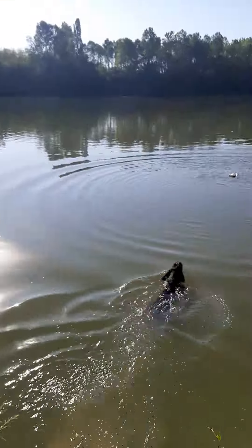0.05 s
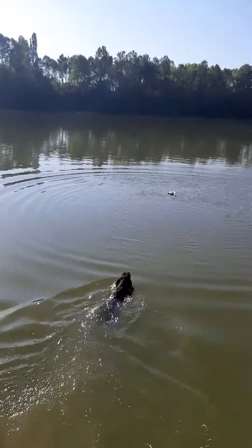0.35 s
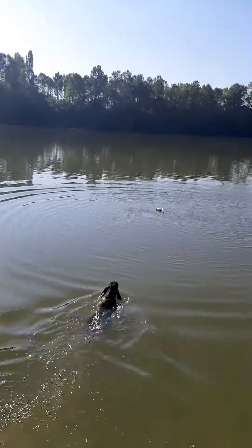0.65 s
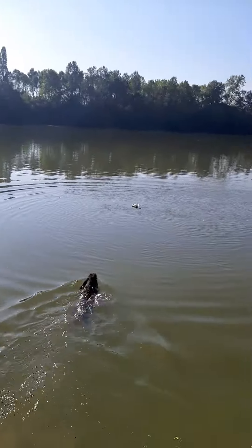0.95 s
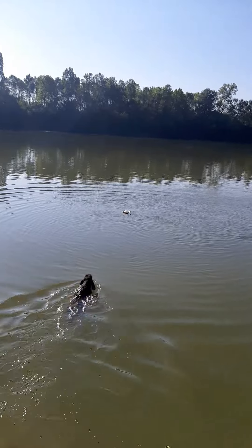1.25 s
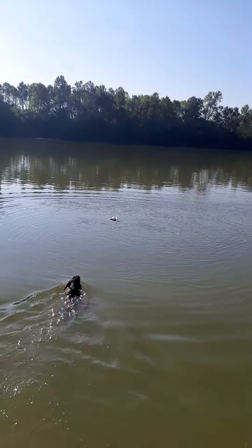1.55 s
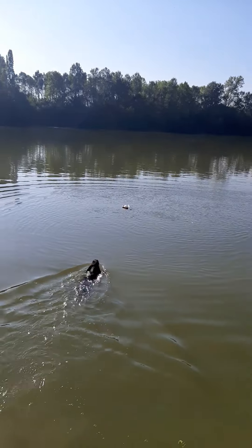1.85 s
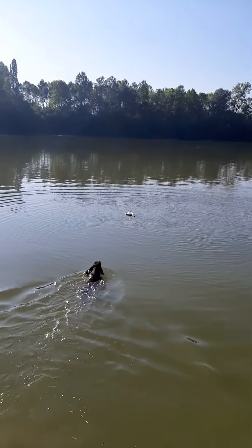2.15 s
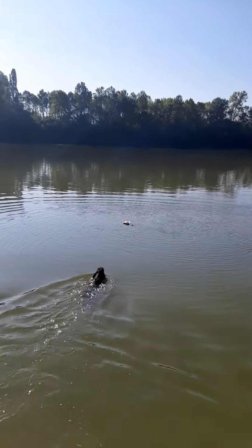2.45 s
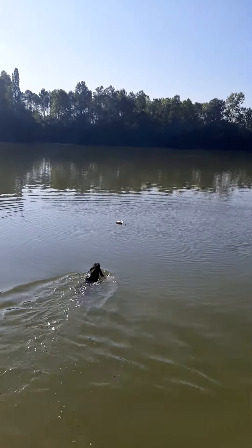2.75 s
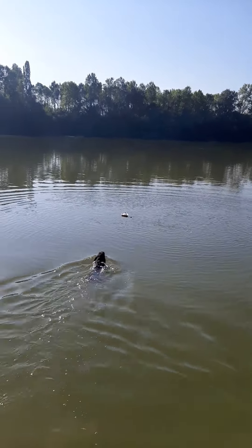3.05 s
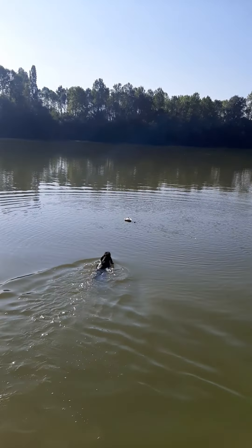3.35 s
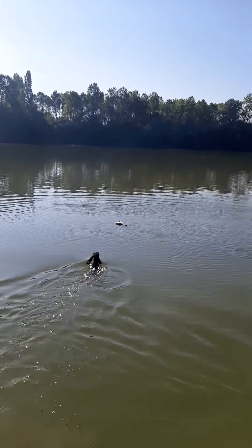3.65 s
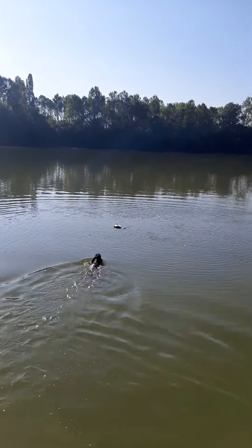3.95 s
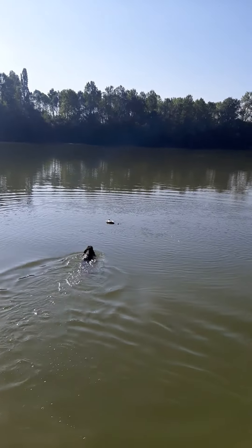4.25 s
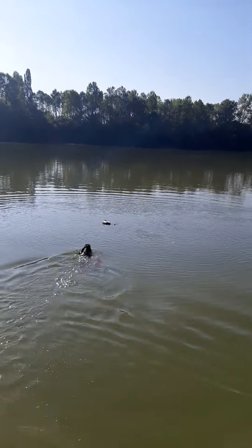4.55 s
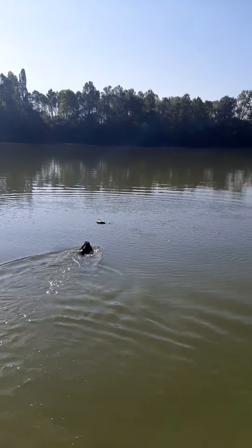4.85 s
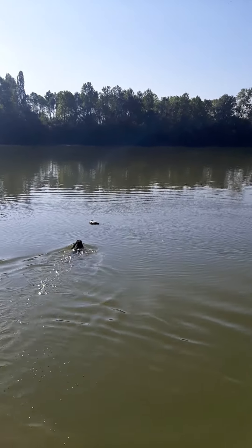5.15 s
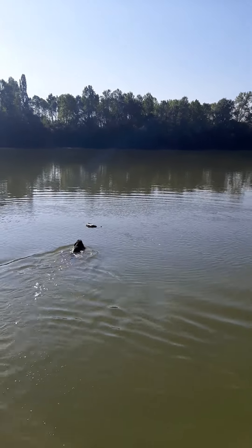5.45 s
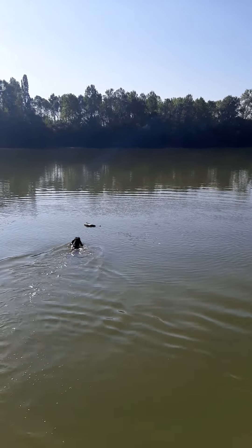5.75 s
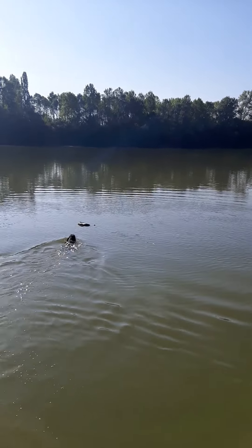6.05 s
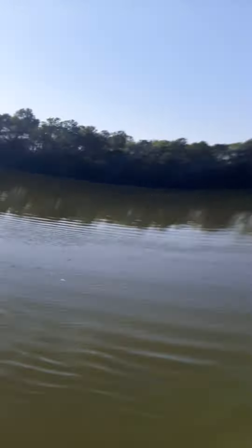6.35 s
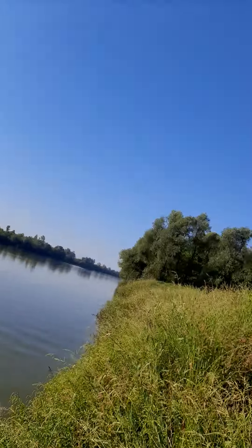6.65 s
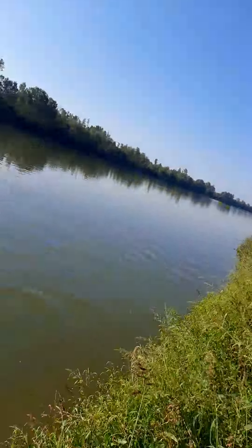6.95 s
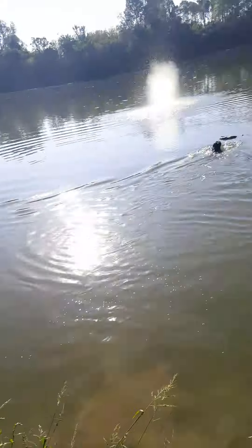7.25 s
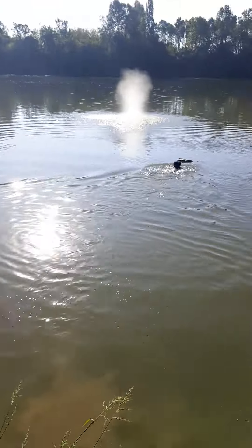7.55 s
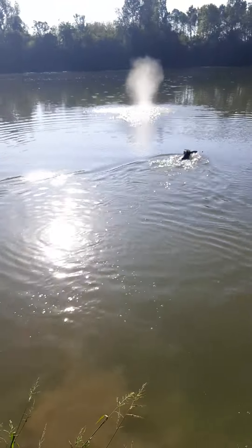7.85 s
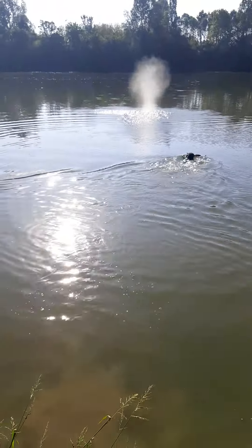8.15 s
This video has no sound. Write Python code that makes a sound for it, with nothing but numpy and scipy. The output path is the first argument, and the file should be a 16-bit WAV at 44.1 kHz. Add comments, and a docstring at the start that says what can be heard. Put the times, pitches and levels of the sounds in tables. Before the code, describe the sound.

Outdoors by a river, water plops and trickles as a dog swims a few metres out, with faint birds and a low hum of distant traffic behind. After a few dry clicks, a gun fires once right beside the microphone. Quick echoes clap from the bank, and a second later a rolling echo returns from distant trees, fading under a faint patter of drops.

```python
"""First a far road and engine hum across a calm river, while a dog paddles away from the stereo microphone,
its paws folding air into plopping bubbles. Small birds call from the trees. A gun beside the microphone
is readied and fired at the water: the near bank rattles back, and a second later the far woods answer
with a long roar while spray patters down. The recorder's gain control ducks at the shot and creeps back."""
import sys
import numpy as np
from scipy import signal
from scipy.fft import rfft, irfft
from scipy.io import wavfile

SR = 44100
rng = np.random.default_rng(int(sys.argv[2]) if len(sys.argv) > 2 else 0)


def transcribe(signal):
    """Save signal, clipped to [-1, 1], as a 16-bit WAV file at the path in sys.argv[1]."""
    frames = np.atleast_2d(signal).T
    limited = np.clip(frames, -1, 1)
    pcm = np.round(limited * 32767).astype(np.int16)
    wavfile.write(sys.argv[1], SR, pcm)


N = 370440
T = np.arange(N) / SR


def undb(db):
    """Decibels to gain."""
    return 10 ** (np.asarray(db) / 20)


def unit(x):
    """Scale to an rms of one; for a pair, that of their mean."""
    return x / np.sqrt(np.mean(np.atleast_2d(x).mean(axis=0) ** 2))


def tint(x, colour):
    """Filter by (Hz, dB) points joined on a log-frequency axis."""
    hz, db = np.transpose(colour)
    f = np.fft.rfftfreq(x.shape[-1], 1 / SR) + 1
    return irfft(rfft(x) * undb(np.interp(np.log(f), np.log(hz), db)), x.shape[-1])


def lowpass(x, hz):
    """Two-pole loss of treble."""
    return signal.sosfilt(signal.butter(2, min(hz, SR / 2 - 1), fs=SR, output="sos"), x)


# width of diffuse sound at the microphone: f/Hz, side minus mid/dB
STEREO_WIDTH = [(110, -12), (200, -15), (380, -8.5), (700, -7), (1200, -1), (2400, 1), (15000, 0)]

def diffuse(colour, size=N, grain_db=0):
    """Coloured stereo noise; grain_db scatters the sizes of its particles."""
    sizes = undb(grain_db * np.minimum(rng.exponential(size=size), 5))
    mid, side = rng.standard_normal((2, size)) * sizes
    return unit(tint(mid + np.outer([1, -1], tint(side, STEREO_WIDTH)), colour))


def octaves(x):
    """Split into overlapping octave bands: (centre Hz, band)."""
    octave = np.clip(np.log2(np.fft.rfftfreq(N, 1 / SR) + 1), 6, 14)
    spectrum = rfft(x)
    return [(2. ** k, irfft(spectrum * np.maximum(1 - abs(octave - k), 0), N)) for k in range(6, 15)]


def wander(per_s):
    """A random curve with a spread near one and per_s new values a second."""
    return np.interp(T * per_s, np.arange(4096), rng.standard_normal(4096))


def fade(t, t60):
    """Exponential decay, 60 dB down after t60."""
    return np.exp(-np.log(1000) * np.maximum(t, 0) / t60)


def envelope(s, db, rise_s, hold_s, t60):
    """Gain of a sound that swells from time s, holds and dies away."""
    return undb(db) * np.clip((T - s) / rise_s, 0, 1) ** 2 * fade(T - s - rise_s - hold_s, t60)


def overlap(rows):
    """Joint gain of several envelopes whose powers add."""
    return np.sqrt(sum(envelope(*row) ** 2 for row in rows))


def tone(hz, db):
    """A sine on a moving pitch, at an rms level."""
    return undb(db) * np.sqrt(2) * np.sin(2 * np.pi * np.cumsum(hz) / SR)


def add(out, s, sound, pan_db=0):
    """Mix a sound in at time s; pan_db is left minus right."""
    start = int(np.clip(s * SR, 0, N - 1))
    gains = undb([[pan_db / 2], [-pan_db / 2]])
    out[:, start:start + sound.shape[-1]] += (gains / gains.mean() * sound)[:, :N - start]


# far road rumble with the microphone's resonances and a faint high hiss: f/Hz, level/dB
BACKGROUND_COLOUR = [(30, -10.5), (86, -1.5), (141, -9.5), (203, -19), (330, -18), (460, -20.5),
                     (535, -15.5), (620, -23), (810, -25.5), (930, -22), (1650, -43), (2030, -34),
                     (2250, -41), (2550, -37.5), (2850, -46), (3500, -50), (7600, -58), (8200, -79),
                     (15800, -50)]

def background(level_db=-50.5, flicker_db=1):
    """Steady road rumble and hiss, coloured by the microphone, swell a little; each octave flickers."""
    swell_db = 0.28 * wander(2.3)
    bands = octaves(diffuse(BACKGROUND_COLOUR))
    return sum(band * undb(level_db + swell_db + flicker_db * wander(21)) for hz, band in bands)


# partials of a far engine, a little to the right: f/Hz, level/dB
ENGINE_PARTIALS = [(46, -55.5), (78, -49.5), (118.4, -57.5), (159, -68), (272, -68.5)]
# swells of a far whine: t/s, level/dB, hold/s
WHINE_SWELLS = [(0, -64, 0.18), (4.553, -67, 1.2)]

def engine(waver_hz=2, throb_db=2.5, trim_db=-1, pan_db=-2.1, whine_hz=406):
    """A throbbing drone and a faint whine drift in pitch with the engine's speed."""
    speed = 1 + 0.01175 * wander(1.7)
    drone = sum(tone(hz * speed + waver_hz * wander(14), db + trim_db + throb_db * wander(9))
                for hz, db in ENGINE_PARTIALS)
    whine = tone(whine_hz * speed + 2.5 * wander(13), 5.3 * wander(24))
    swells = overlap((s, db, 0.076, hold_s, 2.4) for s, db, hold_s in WHINE_SWELLS)
    return drone * undb([[pan_db / 2], [-pan_db / 2]]) + whine * swells


# spectrum of tiny drops behind the dog, a few metres out: f/Hz, level/dB
FIZZ_COLOUR = [(1500, -22), (4000, -2), (7500, -2), (8400, -9), (12000, -0.5), (15500, 0)]

def water_fizz(cluster_db=2.5, swish_db=3.0):
    """Drops of each size come in quick clusters and slower swishes."""
    return sum(band * undb(cluster_db * wander(170) + swish_db * wander(24) - 0.5)
               for hz, band in octaves(diffuse(FIZZ_COLOUR, grain_db=4.5)))


def wake(fizz, level_db=-66, foam_t60=5, start_m=3.9, swim_m_per_s=0.59):
    """Foam by the bank fizzes out; the wake fades as the dog swims away from the microphone."""
    distance_m = start_m + swim_m_per_s * T
    return fizz * np.hypot(fade(T, foam_t60), 1 / distance_m) * undb(level_db + 2 * wander(6.4))


def bubble(hz, cycles, linger=0.1, climb_per_s=22):
    """A pocket of air rings and rises in pitch as it nears the surface, where it lingers faintly."""
    t = T[:SR // 10]
    age = t * hz / cycles
    ring = fade(age, 1) + linger * fade(age, 3)
    swell = 1 - np.exp(-t * hz / 2)  # the neck closes over a couple of cycles
    return np.sin(2 * np.pi * hz * (t + climb_per_s * t ** 2 / 2)) * ring * swell


# paw strokes that trap air, a few metres out: t/s, level/dB, f/Hz, pan/dB, ringing/cycles
PAW_STROKES = [(0.17, -42.5, 1113, -9, 22), (0.21, -46, 900, -3, 31), (0.318, -53, 2100, 0, 24),
               (0.536, -43, 1260, -1, 51), (0.538, -34, 630, 1, 11.5), (0.674, -41, 935, 0, 6.9),
               (0.748, -46.5, 1130, -4, 29), (0.815, -43.5, 1890, 5, 33), (0.867, -37.5, 1710, 5, 32),
               (0.881, -33.5, 720, 1, 16), (0.882, -36, 1680, -4, 16), (0.897, -49, 1530, 0, 20),
               (0.975, -55, 1880, 6, 55), (1.234, -41.5, 920, 2, 13), (1.519, -43, 1076, 1, 16),
               (1.615, -46, 1090, 0, 39), (2.234, -43.5, 1257, 0, 35), (2.27, -41.5, 1120, 1, 14),
               (2.756, -45.5, 1100, 2, 28), (2.755, -49, 2280, 0, 32), (2.876, -51, 1980, 3, 49),
               (2.966, -50, 2040, 0, 28), (3.13, -37.5, 800, 2, 42), (3.71, -39, 890, 5, 10),
               (3.733, -39.5, 1070, -1, 15), (3.747, -47, 1000, 2, 6), (3.764, -37.5, 724, -1, 8.7),
               (3.775, -44, 1760, 4, 23), (3.781, -36, 1516, -7, 32), (3.953, -48, 1130, 0, 27),
               (4.115, -48, 833, -3, 23), (4.45, -38, 1180, 0, 8.3), (5.011, -36, 1610, 1, 11),
               (5.072, -39.5, 1800, -1, 21), (5.083, -45, 1900, 0, 36), (5.21, -46.5, 2410, 5, 37),
               (5.881, -41.5, 2480, 5, 27)]

def paddling(plop_db=3.2, slosh_db=-15, gulp_db=-10, gulp_hz=1400, gulp_cycles=15, stray_db=-60):
    """Each stroke gives one main bubble, a soft slosh and three gulps; strays burst in the wake."""
    out, t = np.zeros((2, N)), T[:SR // 5]
    slosh_colour = [(200, -31), (700, 9), (1900, -2), (2800, -17), (7500, -27), (9000, -40)]
    for s, db, hz, pan_db, cycles in PAW_STROKES:
        add(out, s - .001, undb(db + plop_db) * bubble(hz, cycles), pan_db)
        slosh = diffuse(slosh_colour, size=len(t)) * undb(4 * wander(250)[:len(t)])
        add(out, s, undb(db + slosh_db) * slosh * fade(t, .1) * np.minimum(t / .004, 1), pan_db / 2)
        for late, pitch, size, side in rng.standard_normal((3, 4)):
            gulp = bubble(np.sqrt(hz * gulp_hz) * np.exp(.22 * pitch), gulp_cycles)
            add(out, s + 0.022 * abs(late), undb(db + gulp_db + 2 * size) * gulp, 4 * side)
    for s, (pitch, size, side) in zip(rng.uniform(0, N / SR, size=150), rng.standard_normal((150, 3))):
        stray = bubble(gulp_hz * np.exp(.3 * pitch), gulp_cycles)
        add(out, s, undb(stray_db + 3 * size) * stray, 5 * side)
    return out


# the dog breaking the surface on its way out: t/s, level/dB
DOG_SURGES = [(0.221, -73.5), (0.84, -66.5), (1.179, -78), (1.5, -75), (1.738, -79), (2.19, -69.5),
              (2.733, -71.5), (3.082, -77), (3.29, -73.5), (3.679, -71.5), (3.922, -73), (4.411, -78),
              (4.699, -79), (5.019, -69.5), (5.597, -73.5)]

def surges(fizz, rise_s=0.045, hold_s=0.058, t60=0.66, trickle_hz=1750, trickle_db=14, left_db=3):
    """Each surge throws up a splash of drops and leaves a trickle of small bursting bubbles."""
    swells = overlap((s, db, rise_s, hold_s, t60) for s, db in DOG_SURGES)
    out = lowpass(fizz[:, ::-1], hz=10000) * swells
    for s, db in DOG_SURGES:
        for late, pitch, size, side in rng.standard_normal((20, 4)):
            ring = bubble(trickle_hz * np.exp(.24 * pitch), cycles=24)
            gain = undb(db + trickle_db + 2.5 * size - 2 * pitch)
            add(out, s + 0.1 * abs(late), gain * ring, left_db + 4 * side)
    return out


# small birds off in the trees: t/s, length/s, start f/Hz, end f/Hz, level/dB
BIRD_NOTES = [(0.379, 0.065, 4890, 3430, -53), (1.767, .1, 4000, 2860, -67), (2.82, 0.065, 4630, 3300, -58),
              (2.948, 0.07, 5200, 3060, -61), (3.2, .09, 5550, 5750, -74), (3.613, 0.11, 5900, 3580, -65),
              (4.64, 0.098, 5950, 5220, -72), (5.045, 0.091, 7650, 7350, -77),
              (5.235, 0.14, 7750, 7700, -73.5), (5.57, 0.11, 5870, 5340, -68),
              (5.612, 0.051, 4040, 3700, -62), (5.954, 0.082, 5800, 5650, -58),
              (5.973, 0.045, 4340, 3600, -54)]

def birds(arch=0.018, flutter_db=6.5, trim_db=-17, trees_db=3, trees_t60=.2):
    """Thin, fluttering notes, most of them falling, reach the microphone largely by way of the trees."""
    out = np.zeros((2, N))
    for s, length, start_hz, end_hz, db in BIRD_NOTES:
        progress = np.linspace(0, 1, int(length * SR))
        bow = np.abs(np.sin(np.pi * progress))
        rasp = .003 + 0.14 * abs(1 - end_hz / start_hz)  # steeper slurs rasp more
        wobble = rasp * wander(480)[:len(bow)]
        flutter = flutter_db * wander(200)[:len(bow)]
        hz = (start_hz + (end_hz - start_hz) * progress) * (1 + arch * bow + wobble)
        add(out, s, tone(hz, db + trim_db + flutter) * np.sqrt(bow))
    trees = rng.standard_normal((2, SR)) * fade(T[:SR], trees_t60)
    trees /= np.linalg.norm(trees[0])
    return out + undb(trees_db) * signal.fftconvolve(out, trees, axes=1)[:, :N]


# clicks of the gun, close to the microphone: t/s, level/dB, centre f/Hz, t60/s
GUN_CLICKS = [(1.232, -52, 3620, 0.048), (1.52, -56, 4230, 0.07), (4.941, -53.5, 2420, 0.12),
              (4.984, -51.5, 3780, 0.074), (5.006, -48.5, 4300, 0.077), (5.039, -40.5, 9350, 0.0073),
              (5.075, -49, 3080, 0.048), (6.079, -57, 4900, 0.034), (7.94, -46, 6300, 0.089),
              (8.355, -43.5, 4830, 0.13)]

def gun_handling(trim_db=-5):
    """Metal and stock give short dry ticks."""
    out, t = np.zeros((2, N)), T[:SR // 5]
    for s, db, hz, t60 in GUN_CLICKS:
        colour = [(hz / 6, -12), (hz / 2, -1), (hz, 0), (hz * 2, -13), (hz * 4, -24)]
        add(out, s, undb(db + trim_db) * diffuse(colour, size=len(t)) * fade(t, t60))
    return out


# spectrum of the blast beside the microphone: f/Hz, level/dB
BLAST_COLOUR = [(40, -38), (70, -7.5), (110, 5), (175, -4), (250, 2), (400, -3), (700, -3.5), (1000, -4),
                (1900, -5.5), (3500, -11), (6000, -11), (8700, -16.5), (11400, -12.5), (15800, -13.5)]
# muzzle blast, its slap off the water, the shot striking: t/s, level/dB, hold/s, t60/s, cutoff f/Hz
SHOT_BLOWS = [(6.124, -5.5, 0.046, 0.41, 16600), (6.158, -1.5, 0.0048, 0.094, 2270),
              (6.211, -1.5, 0.014, 0.048, 4300)]

def gunshot(boom_hz=114, boom_db=-10, boom_t60=0.62, ragged_db=2):
    """Each blow is a ragged burst that holds briefly and dies; a low boom rings on below."""
    out, t = np.zeros((2, N)), T[:SR]
    for s, db, hold_s, t60, cutoff_hz in SHOT_BLOWS:
        burst = unit(lowpass(diffuse(BLAST_COLOUR, size=SR), cutoff_hz))
        burst *= undb(db + ragged_db * wander(400)[:SR])
        add(out, s, burst * np.minimum(t / 0.0014, 1) * fade(t - hold_s, t60))
    boom = np.sin(2 * np.pi * boom_hz * t) * np.minimum(t / .012, 1) * fade(t, boom_t60)
    slap_s = SHOT_BLOWS[1][0]
    add(out, slap_s - .01, undb(boom_db) * boom)
    return out


# spectrum of the echo off the near bank's grass: f/Hz, level/dB
GRASS_COLOUR = [(70, -23.5), (120, -6), (200, -15.5), (280, 0), (650, -1), (1100, 0.5), (2200, -3),
                (3200, -8.5), (5200, -8), (7500, -14.5), (9000, -20), (15800, -31)]
# stretches of grass, near then far: t/s, level/dB, rise/s, hold/s, t60/s
GRASS_ECHOES = [(6.14, -18, 0.081, 0.0037, 0.47), (6.34, -28, 0.051, 0.043, 1.5)]

def grass(air_db_per_khz_s=4, bass_db_per_s=14, ragged_db=2):
    """Grass scatters the blast into a tail that loses its treble and bass first."""
    out, age = 0, np.maximum(T - 6.4, -.2)
    for hz, band in octaves(diffuse(GRASS_COLOUR)):
        loss_db_per_s = air_db_per_khz_s * hz / 1e3 + bass_db_per_s / (1 + hz / 250)
        out += band * undb(ragged_db * wander(73) - loss_db_per_s * age)
    return out * overlap(GRASS_ECHOES) * undb(0.2 * wander(45))


# spectrum of one bush's echo: f/centre f, level/dB
BUSH_COLOUR = [(.1, -6), (.45, -16), (1, 1), (1.9, -19), (5, -30.5), (10, -48)]
# bushes along the near bank: t/s, level/dB, centre f/Hz, t60/s
BUSH_ECHOES = [(6.272, -18, 2450, 0.28), (6.306, -19, 1320, 0.04), (6.427, -29, 1447, 0.17),
               (6.447, -28.5, 298, 0.14), (6.566, -16.5, 1020, 0.034), (6.598, -26.5, 1060, 0.11),
               (6.63, -34, 1890, 0.064), (6.689, -35.5, 1100, 0.045), (6.719, -34, 1040, 0.079),
               (6.799, -38.5, 733, 0.087), (6.977, -44, 867, 0.022), (7.056, -43, 480, 0.21),
               (7.087, -34, 472, 0.1)]

def bushes():
    """Each bush returns the blast as a separate clap."""
    out, t = np.zeros((2, N)), T[:SR // 2]
    for s, db, hz, t60 in BUSH_ECHOES:
        clap = diffuse([(hz * ratio, gain_db) for ratio, gain_db in BUSH_COLOUR], size=len(t))
        add(out, s, undb(db) * clap * np.minimum(t / 0.0013, 1) * fade(t - .004, t60))
    return out


# spectrum of a high rustle and of spray landing out on the river: f/Hz, level/dB
RUSTLE_SPRAY_COLOUR = [(2000, -18), (6500, -1), (9000, -9), (11000, -3.5), (12800, 1), (15500, -5)]
# faint high rustle after the shot, then the falling spray: t/s, level/dB, rise/s, hold/s, t60/s
RUSTLE_SPRAY_SWELLS = [(6.6, -65.5, 0.42, 0.35, 5.3), (7.42, -62, 0.15, 0.38, 0.39)]

def rustle_and_spray():
    """A faint high rustle follows the shot; then the water it threw up rains back in tiny drops."""
    grains = diffuse(RUSTLE_SPRAY_COLOUR, grain_db=5.5)
    return grains * overlap(RUSTLE_SPRAY_SWELLS) * undb(1.1 * wander(110))


# spectrum of the roar from the far woods: f/Hz, level/dB
WOODS_COLOUR = [(29, -66), (50, -38), (64, -35.5), (85, -15), (142, -5.5), (215, -4), (290, 5), (376, -3.5),
                (500, -3.5), (715, -8), (1090, -14.5), (2100, -18), (5030, -39.5), (10000, -59),
                (13000, -64), (22000, -120)]
# woodland facing the microphone, then downriver: t/s, level/dB, rise/s, hold/s, t60/s
WOODS_ECHOES = [(7.076, -29.5, 0.062, 0.43, 2.19), (7.978, -40, 0.29, .2, 2.4)]

def far_woods(air_db_per_khz_s=1.5, trunk_lag_s=0.025, ragged_db=5):
    """Countless trees echo the blast, bright leaves first, trunks later; air dulls the longer paths."""
    roar, gain = 0, overlap(WOODS_ECHOES)
    extra_travel_s = np.maximum(T - 7.25, -.15)
    for hz, band in octaves(diffuse(WOODS_COLOUR)):
        bass_share = 1 / (1 + hz / 1500)
        level_db = ragged_db * bass_share * wander(55) - air_db_per_khz_s * hz / 1e3 * extra_travel_s
        delayed_gain = np.interp(T - trunk_lag_s * bass_share, T, gain)
        roar += band * delayed_gain * undb(level_db)
    leaves = diffuse([(1500, -16), (4000, -0.5), (5800, -7.5), (8500, -22), (15000, -36)])
    return roar + leaves * envelope(WOODS_ECHOES[0][0], db=-44, rise_s=0.052, hold_s=0.064, t60=1.8)


def far_bank(ragged_db=2.5):
    """The earth of the opposite bank returns the blast as a dull thud at the head of the roar."""
    colour = [(50, -31), (90, 6.5), (210, 5), (400, -10), (560, 1), (800, -12), (1300, -37), (5000, -62)]
    thud = diffuse(colour) * envelope(s=7.13, db=-34, rise_s=0.022, hold_s=0.096, t60=0.61)
    return thud * undb(ragged_db * wander(70))


def scene():
    """The river, the dog and the shot with its echoes, heard from the near bank."""
    ambience = background() + engine() + birds()
    fizz = water_fizz()
    dog = wake(fizz) + paddling() + surges(fizz)
    gun = gun_handling() + gunshot()
    return ambience + dog + gun + grass() + bushes() + rustle_and_spray() + far_woods() + far_bank()


def record(dry, limit_db=-18, attack_s=0.0087, recover_db_per_s=10, low_cut_hz=40, top_hz=15800,
           hiss_db=-89, balance_db=0.5):
    """The microphone drops deep bass; gain control clamps fast and recovers slowly; peaks are rounded."""
    dry = signal.sosfilt(signal.butter(6, low_cut_hz, "high", fs=SR, output="sos"), dry)
    pole = np.exp(-1 / (attack_s * SR))
    power = signal.lfilter([1 - pole], [1, -pole], np.mean(dry ** 2, axis=0))
    recovery_db = recover_db_per_s * T
    held_db = np.maximum.accumulate(10 * np.log10(power + 1e-12) + recovery_db) - recovery_db
    duck_db = np.minimum(limit_db - held_db, 0)
    ducked = dry * undb(duck_db + np.array([[balance_db], [-balance_db]]) / 2)
    rounded = .7 * np.tanh(ducked / .7)
    hiss = undb(hiss_db) * rng.standard_normal((2, N))
    return signal.sosfilt(signal.ellip(10, .2, 80, top_hz, fs=SR, output="sos"), rounded + hiss)


dry = scene()
out = record(dry)
transcribe(out)
```